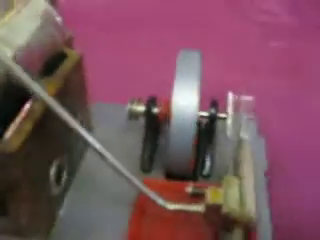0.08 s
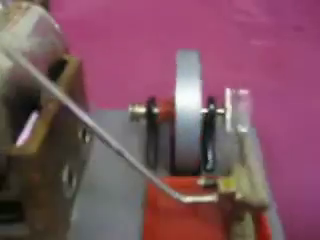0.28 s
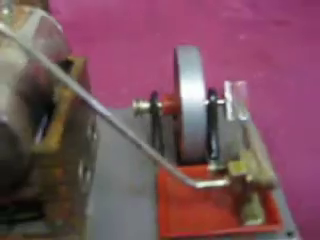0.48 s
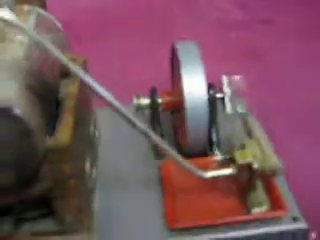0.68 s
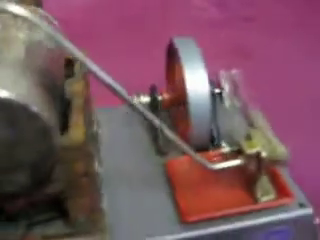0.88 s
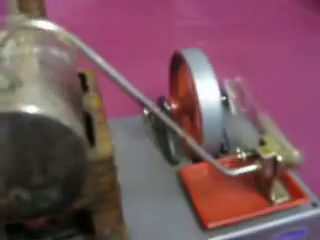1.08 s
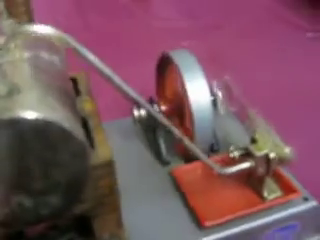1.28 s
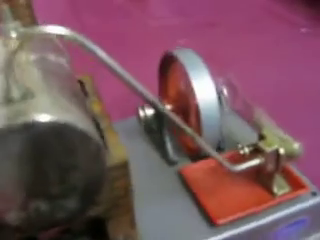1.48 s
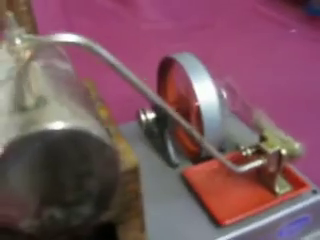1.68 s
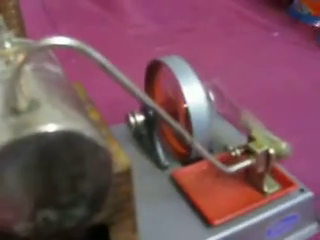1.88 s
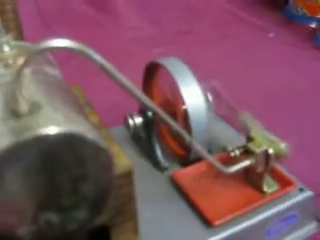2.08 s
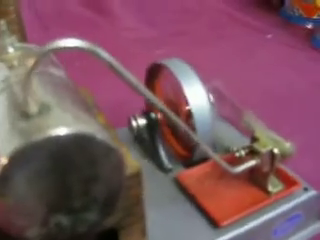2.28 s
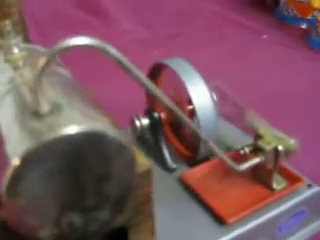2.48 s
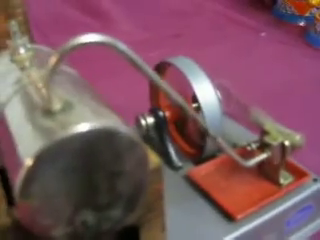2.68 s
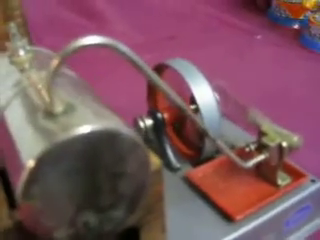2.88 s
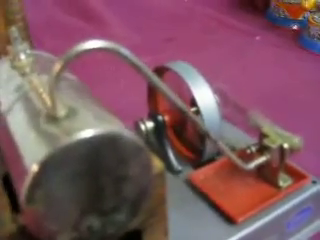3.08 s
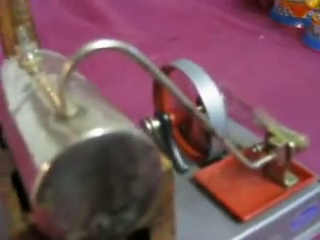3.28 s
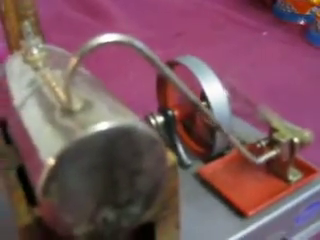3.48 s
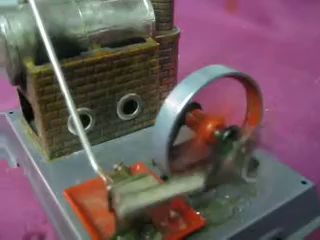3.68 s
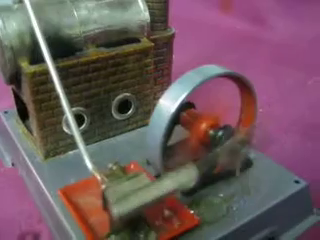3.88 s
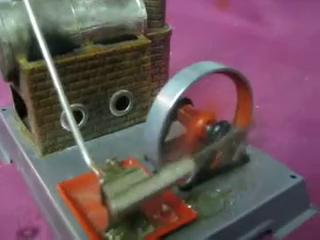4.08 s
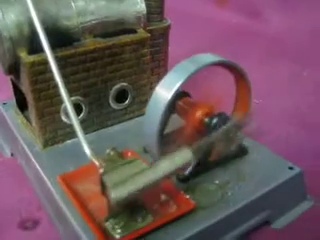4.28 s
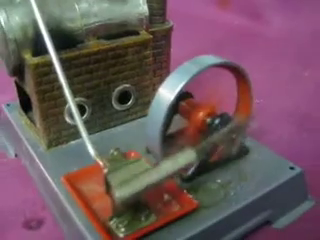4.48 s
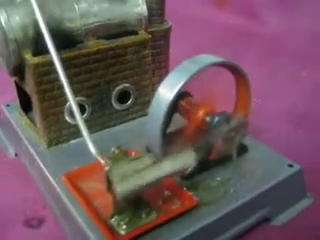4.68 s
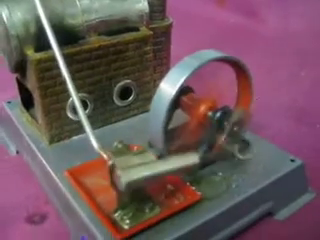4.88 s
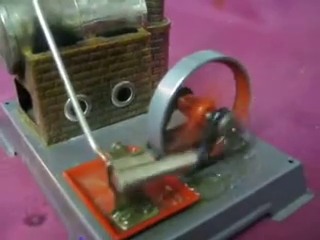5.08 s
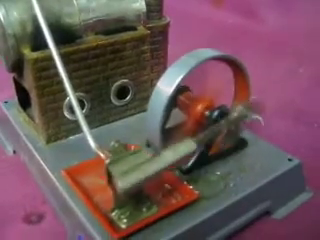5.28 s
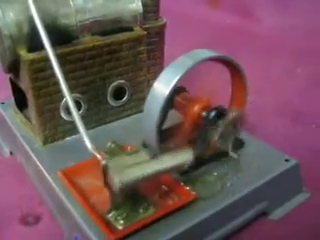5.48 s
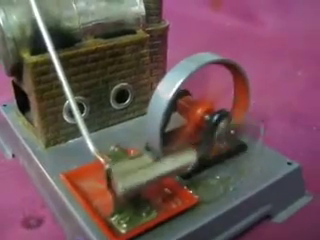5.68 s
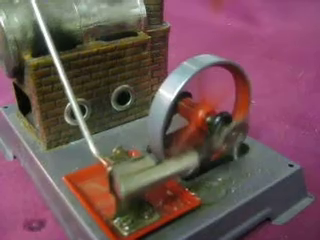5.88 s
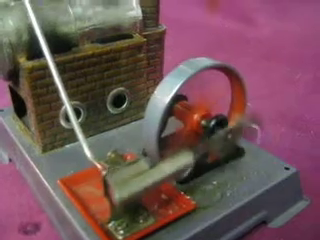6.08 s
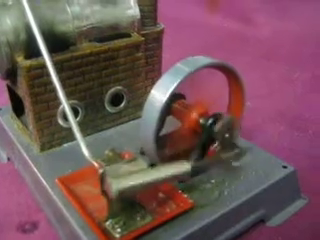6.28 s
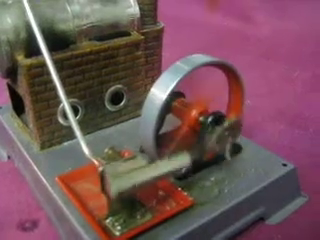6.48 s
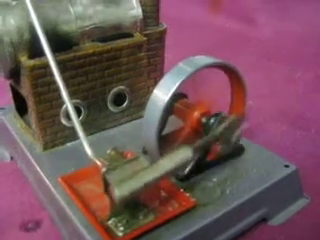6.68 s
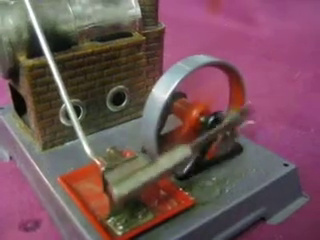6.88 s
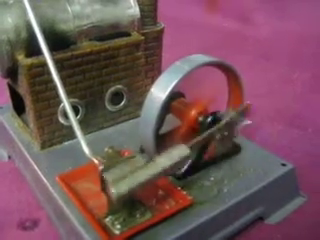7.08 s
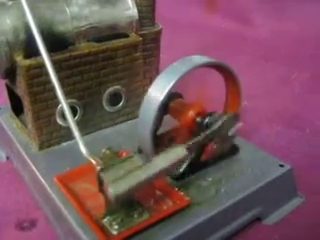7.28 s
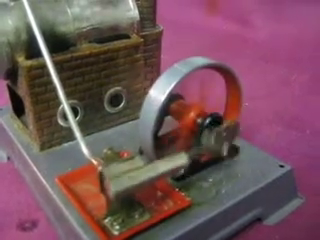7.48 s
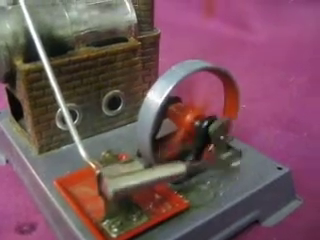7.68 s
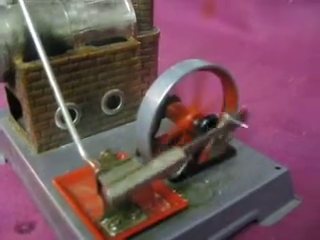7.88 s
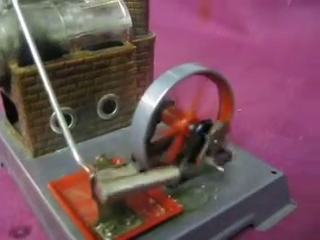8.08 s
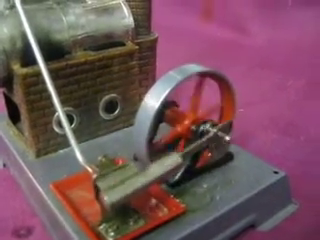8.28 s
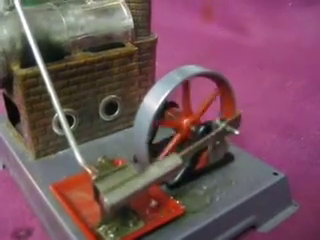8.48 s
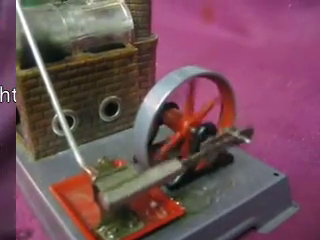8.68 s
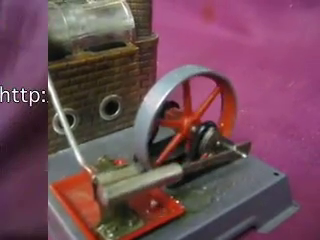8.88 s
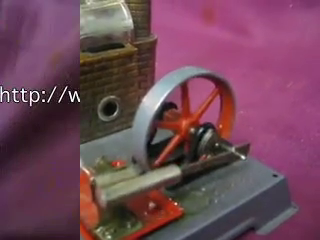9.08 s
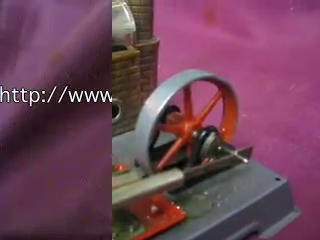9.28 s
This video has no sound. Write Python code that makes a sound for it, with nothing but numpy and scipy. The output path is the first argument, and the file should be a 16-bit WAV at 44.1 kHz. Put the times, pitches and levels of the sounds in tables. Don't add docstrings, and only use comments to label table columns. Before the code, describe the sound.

From 0 to 3.56 seconds a toy steam engine races close to the microphone: metallic knocks at about twenty-nine per second fuse into a harsh, tinny buzz, with whirring tin and pulsing steam. Its colour shifts between 0.5 and 1.75 seconds, a boiler-wall whine emerges, and the effort surges around 1.4 and 1.65. Silence lasts until about 3.7. Then slower running begins, roughly eleven turns a second: chattering clacks, bright springy rebounds, short wet exhaust puffs and gritty bearing rattle over steady boiler hiss. A faint high squeak appears around 5.5. The beats steadily spread apart, rebounds fade and the hiss sinks. Loose metal drops around 7.3 and 7.6, then a sharper one near 8.3; a longer soft puff follows at 8.8 as the wheel nearly stalls and weak hiss fades towards 9.3. The sound is thin, close and low in bass.

```python
import sys
import numpy as np
from scipy import signal
from scipy.fft import rfft, irfft
from scipy.io import wavfile
from scipy.ndimage import uniform_filter1d

SR = 44100
rng = np.random.default_rng(int(sys.argv[2]) if len(sys.argv) > 2 else 0)


def inscribe(sig):
    pcm = np.round(np.clip(np.atleast_2d(sig).T, -1, 1) * 32767)
    wavfile.write(sys.argv[1], SR, pcm.astype(np.int16))


def rack_gain(trim_db):
    fader = np.asarray(trim_db, float)
    return 10 ** (fader / 20)


N = 411012
T = np.arange(N) / SR
CUT_START_S, CUT_END_S = 3.5618, 3.6945


def evened(x):
    return x / np.sqrt(np.mean(x ** 2) + 1e-20)


def noise(spectrum, size=N):
    f, db = np.transpose(spectrum)
    hz = np.fft.rfftfreq(size, 1 / SR)
    shape = rack_gain(np.interp(np.log(hz + 1), np.log(f), db))
    return evened(irfft(rfft(rng.standard_normal(size)) * shape, size))


def hump(centre_s, half_s):
    return np.exp(-((T - centre_s) / half_s) ** 4)


# frequency in Hz, level in dB per Hz.
CRACK = [(180, -33), (300, 10), (711, 9), (2340, 8.5), (4320, 4), (5640, 4.5), (6290, 7.5), (7960, -4),
         (10400, -9), (12700, -23), (16600, -86), (22000, -120)]


def ring(modes, tilt_db, spread_db, crack_db, crack_t60, colour=CRACK):
    hz, db, t60 = np.transpose(modes)[:, :, None]
    t = np.arange(6000) / SR
    luck, phase = rng.uniform(-0.97, 1, (2, len(modes), 1))
    level_db = db + tilt_db * np.log2(hz / 2500) + spread_db * luck - 60 * t / t60
    body = np.sum(rack_gain(level_db) * np.sin(2 * np.pi * hz * t + np.pi * phase), axis=0)
    body /= np.sqrt(np.mean(body[:200] ** 2))
    crack = rack_gain(crack_db - 60 * t / crack_t60) * noise(colour, len(t))
    onset = np.minimum(t / .00015, 1)
    return (body + crack) * onset


def strike(times, sizes, sound):
    samples = np.round(np.maximum(times, 0) * SR).astype(int)
    train = np.bincount(samples, sizes * (times >= 0))
    start = np.flatnonzero(train)[0]
    played = signal.oaconvolve(train[start:], sound)[:N - start]
    return np.pad(played, (start, N - start - len(played)))


def radiated(x):
    return signal.sosfilt(signal.butter(8, 570, "high", fs=SR, output="sos"), x)


def view():
    start_s, end_s = .5, 1.75
    return np.sin(np.pi / 2 * np.clip((T - start_s) / (end_s - start_s), 0, 1)) ** 2


def racing_crank():
    start_turn, rps = -.03894, 28.94145
    spurt_turns, spurt_s, spurt_length_s = .10145, 1.19057, .63608
    return start_turn + rps * T + spurt_turns * np.tanh((T - spurt_s) / spurt_length_s)


# crank angle in turns, level in dB, brightness in dB per octave.
BLOWS = [(.018, 5.5, 0), (.038, -1, 3.5), (.066, -3.5, -3), (0.096, -7, -6), (0.129, -8, 0.5),
         (0.211, -4.5, -4), (.39, -18, 5), (0.472, -7.5, -13), (.52, -16, -3.5), (0.578, -9.5, -6),
         (0.719, -14, -14.5), (0.861, -10, 4)]
# frequency in Hz, level in dB at the start of the swing,
# level in dB at its end, t60 in seconds.
FRAME = [(820, -5, -12, 0.011), (1150, -11, -13, 0.033), (1720, -2, -30, 0.013), (3600, -12, -5, 0.025),
         (2676, 0, -8, 0.01), (2980, -14, -10, .03), (3400, -6, -9, .025), (3880, -2, -7, .024),
         (3975, -11, -5, .024), (4330, 3, -13, .02), (4450, 3, -12, .018), (4740, -6, -2, .017),
         (5200, -11, -15, .015), (6400, -4, -10, .015), (6750, -11, -11, .015), (7200, -3, -7, 0.01),
         (8900, -9, -10, 0.004), (10300, -30, -18, 0.019)]
# frequency in Hz, level in dB per Hz.
CLATTER = [(300, -41), (560, -26), (650, 10.5), (2000, -14), (3000, -5.5), (4800, 5), (5500, 2),
           (7000, 21.5), (10300, -12.5), (12500, -44), (16000, -71)]


def racing_knock(crank):
    turns = np.arange(0, np.interp(CUT_START_S, T, crank))
    wheel_modes, boiler_modes = np.delete(FRAME, 2, axis=1), np.delete(FRAME, 1, axis=1)
    sides = np.zeros((2, N))
    force_db = .7 * rng.standard_normal(len(turns))
    for angle, db, tilt_db in BLOWS:
        late, size = rng.standard_normal((len(turns), 2)).T
        times = np.interp(turns + angle, crank, T) + .000012 * late
        for side, modes in zip(sides, (wheel_modes, boiler_modes)):
            sound = ring(modes, tilt_db, spread_db=2.5, crack_db=-8, crack_t60=0.014, colour=CLATTER)
            side += strike(times, rack_gain(db + force_db + .8 * size), sound)
    swing = np.pi / 2 * view()
    knock = radiated(np.cos(swing) * sides[0] + np.sin(swing) * sides[1])
    return knock / np.std(knock[T < CUT_START_S])


def wall_whine(crank, rattle):
    hz, t60, struck_turn = 2293, .16, .3
    t = np.arange(6000) / SR
    blows = np.diff(np.floor(crank - struck_turn), prepend=-1)
    response = rack_gain(-60 * t / t60) * np.sin(2 * np.pi * hz * t)
    return evened(signal.oaconvolve(blows + 0.0062 * rattle / np.std(rattle), response)[:N])


# frequency in Hz, level in dB.
WHIRR = [(540, -44), (600, -10.5), (640, -2), (850, -1), (1200, -5.5), (1700, -2.5), (2200, -1.5),
         (3000, -3.5), (5000, -34)]
# frequency in Hz, width in Hz, gain in dB.
TIN = [(642, 62, 5.4), (717, 20, 3.9), (813, 17, 1.1), (954, 11, 5.9), (1220, 25, 12.4), (1350, 14, 4.7),
       (1427, 57, 10.5), (1625, 21, 10.6), (1910, 30, 8.3), (2600, 68, 3.8), (2820, 34, 1.1)]


def whirr(crank):
    t = T[:round(CUT_START_S * SR) + 1]
    order = np.arange(18, 150)[:, None]
    hz = 29 * order
    f, db = np.transpose(WHIRR)
    level_db = np.interp(np.log(hz), np.log(f), db)
    level_db = level_db + sum(gain / (1 + (2 * (hz - c) / width) ** 2) for c, width, gain in TIN)
    wander = signal.resample(rng.standard_normal((2, len(order), 6)), 400, axis=2)
    steady = rng.uniform(0, 2 * np.pi, hz.shape)
    knots = np.linspace(0, t[-1], 400)
    rattle = np.zeros(N)
    for k, db, drift, slip, phase in zip(order, level_db, *wander, steady):
        slow = np.interp(t, knots, rack_gain(db + 2 * drift) * np.exp(.5j * slip))
        rattle[:len(t)] += (slow * np.exp(1j * (2 * np.pi * k * crank[:len(t)] + phase))).real
    whine_db = -1.5 - 10 * np.exp(-T / .4)
    out = evened(rattle) + rack_gain(whine_db) * wall_whine(crank, rattle)
    beat = 1 + 0.26 * np.cos(4 * np.pi * (crank - .02))
    return beat * out / np.std(out[:len(t)])


# frequency in Hz, level in dB per Hz.
LEAK = [(20, -21), (200, -11), (450, -9.5), (700, -13), (1000, -2.5), (2300, 4.5), (4700, 0.5),
        (5800, -2.5), (7000, 1.5), (8500, -5), (10500, -8.5), (12500, -29), (16000, -87)]


def steam_leak(crank):
    first = 2.9 * np.exp(-((crank - .02) % 1) / 0.054)
    second = 1.3 * np.exp(-((crank - .5) % 1) / 0.065)
    return evened((1 + first + second) * noise(LEAK))


# shaft order, level in dB.
SHAKE = [(1, -72), (2, -57), (3, -61), (4, -61), (5, -63), (6, -67), (7, -64), (8, -66), (10, -61),
         (11, -61), (14, -63)]


def shaft_shake(crank):
    return sum(rack_gain(db + 3) * np.sin(2 * np.pi * (k * crank + rng.random())) for k, db in SHAKE)


def groan():
    return rack_gain(-47) * hump(.485, .035) * np.sin(2 * np.pi * 203 * T)


# centre in seconds, half width in seconds, gain in dB.
SURGES = [
    (0.221, 0.064, 0.7),
    (1.38, 0.11, 1.5),
    (1.65, 0.041, 0.9),
]


def racing():
    crank = racing_crank()
    engine = rack_gain(-25.5) * racing_knock(crank) + rack_gain(-28.5) * whirr(crank) + rack_gain(-31.5) * steam_leak(crank)
    effort_db = 0.4 - 0.55 * T + sum(gain * hump(centre, half) for centre, half, gain in SURGES)
    return rack_gain(effort_db) * engine + shaft_shake(crank) + groan()


FIRST_S, SPEED_LAW = 3.72086, (10.92537, -1.62803, .024941, -.022753)


def speed():
    return np.maximum(np.polyval(SPEED_LAW[::-1], T - FIRST_S), .3)


def run_down():
    turns = np.cumsum(speed()) / SR
    return turns - np.interp(FIRST_S, T, turns)


# frequency in Hz, level in dB per Hz.
BOILER = [(18, -19), (30, -20), (115, -10), (156, -7), (341, -6.5), (462, -9), (642, -9.5), (1040, -4),
          (1440, -7.5), (3410, -5.5), (6110, -7.5), (7870, -14.5), (10100, -11.5), (12700, -40),
          (16600, -62), (22000, -120)]
# time in seconds, hiss level in dB.
PRESSURE = [(3.69, -35), (4.8, -38), (5.8, -39), (7.8, -40.5), (8.6, -42), (9.32, -46.5)]


def boiler_hiss():
    time_s, db = np.transpose(PRESSURE)
    return rack_gain(np.interp(T, time_s, db) - 4.5) * noise(BOILER)


# frequency in Hz, level in dB, t60 in seconds.
BASE = [(757, -10.5, .11), (843, -12, .11), (925, -13, .07), (1044, -18, .06), (1175, -13, .06),
        (1500, -22, .06), (1650, -20, .06), (1820, -7, .055), (2500, -24, .05), (2680, -25, .05),
        (3010, -9, .03), (3540, -18, .05), (3975, -9, .06), (4097, -12, .1), (4152, -11, .08),
        (4235, -3, .03), (4540, -2, .026), (4650, -10, .05), (5320, -22, .04), (5910, -19, .05),
        (6270, -4, .03), (6960, -12, .03), (8600, -17, .02), (9250, -16, .02), (10100, -20, .02)]


def bearing_rattle():
    table_hz, table_width_hz, table_db = 297.4, 12, -13
    grit = (rng.random(N) < 400 / SR) * rng.standard_normal(N) * rack_gain(2 * rng.exponential(1, N))
    base = ring(BASE, -5, spread_db=1, crack_db=-6, crack_t60=.03)
    rattle = evened(signal.oaconvolve(grit, base)[:N])
    table = signal.iirpeak(table_hz, table_hz / table_width_hz, SR)
    rattle += rack_gain(table_db) * evened(signal.lfilter(*table, grit))
    return rack_gain(-40.5) * (speed() / SPEED_LAW[0]) ** 1.25 * rattle


# delay in seconds, level in dB, brightness in dB per octave.
CHATTER = [
    (0, 4, 1.5),
    (.0011, 0.5, 0),
    (.0026, -9, 3),
    (.007, -15.5, 1),
    (.013, -5, 3),
]


def knock(knock_s, knock_db):
    out = np.zeros(N)
    for delay, db, tilt_db in CHATTER:
        late, size = rng.standard_normal((len(knock_s), 2)).T
        sound = ring(BASE, tilt_db, spread_db=4, crack_db=0, crack_t60=0.015)
        out += strike(knock_s + delay * (1 + .015 * late), rack_gain(knock_db + db - 1 + .7 * size), sound)
    return out


def noisy_tail(times, levels_db):
    t = np.arange(9000) / SR
    fade = rack_gain(-60 * t / 0.17) * np.minimum(t / 0.0028, 1)
    return strike(times, rack_gain(levels_db), fade) * noise(CRACK)


# frequency in Hz, level in dB, t60 in seconds.
PIN = [(1055, -7, 0.13), (1564, -6.5, 0.084), (1960, -9, 0.042), (2450, -9, 0.09), (3200, -4.5, 0.037),
       (3520, -5.5, 0.081), (4010, 0.5, .04), (4480, 7.5, 0.021), (5390, -3.5, 0.017), (6500, -10, .03),
       (9170, 1, 0.012)]


def rebound(back_s, back_db):
    return strike(back_s, rack_gain(back_db), ring(PIN, -1.5, spread_db=3.5, crack_db=4.5, crack_t60=0.0075))


def thump(puffs, lost_rps):
    centre_s, half_s, puff_db = np.transpose(puffs)
    thump_db = puff_db + 2 - 1.5 * np.minimum(lost_rps, 4.5)
    sound = ring(BASE, -3.5, spread_db=2, crack_db=0, crack_t60=.015)
    return strike(centre_s - 0.71 * half_s, rack_gain(thump_db), sound)


# frequency in Hz, level in dB per Hz.
PUFF = [(180, -58), (300, -35), (858, -22), (1020, -12), (1530, -44), (1710, -17.5), (3470, -10.5),
        (4890, -21), (6800, -7), (9310, -9.5), (12700, -44), (16600, -81), (22000, -120)]


def exhaust(puffs):
    jet = sum(rack_gain(db) * hump(centre, half) for centre, half, db in puffs)
    sputter = rack_gain(3 * evened(uniform_filter1d(rng.standard_normal(N), 90)))
    return jet * sputter * noise(PUFF)


def rod_drag(knock_s, period, knock_db):
    creep_turn, half_turn = .94, 0.077
    drag = sum(rack_gain(db - 17.5) * hump(start + creep_turn * p, half_turn * p)
               for start, p, db in zip(knock_s, period, knock_db))
    scrape = ring(BASE, -6, spread_db=-1, crack_db=5, crack_t60=.03)
    return signal.oaconvolve(drag * rng.standard_normal(N), scrape / np.linalg.norm(scrape))[:N]


def squeak():
    pitch_hz = 5975 + 50 * np.cos(2 * np.pi * (run_down() + .15))
    level_db = -46 + 2 * evened(uniform_filter1d(rng.standard_normal(N), 400))
    return rack_gain(level_db) * hump(5.535, .14) * np.sin(2 * np.pi * np.cumsum(pitch_hz) / SR)


# time in seconds, level in dB.
LOOSE = [
    (7.318, -38),
    (7.566, -31),
    (8.246, -45),
    (8.3203, -23.5),
    (8.422, -37),
    (8.44, -45),
]
# centre in seconds, half width in seconds, level in dB.
LAST_PUFFS = [
    (7.98, 0.013, -37.5),
    (8.197, .011, -35),
    (8.77, 0.041, -36.5),
]


def coasting():
    turns, soft_rps = 31, 4.53
    rebound_turn, puff_turn, puff_half_turn = .199, .51, .042
    knock_s = np.interp(np.arange(turns), run_down(), T)
    period, rps = np.diff(knock_s), np.interp(knock_s, T, speed())
    lost_rps = SPEED_LAW[0] - rps[:-1]
    knock_db = -22.5 - 10 * np.log10(1 + (soft_rps / rps) ** 4)
    rebound_db = -20.5 - 6.5 * np.maximum(lost_rps - .8, 0)
    puff_db = -30.5 - lost_rps - 1.9 * rng.standard_normal(len(lost_rps))
    loose_s, loose_db = np.transpose(LOOSE)
    back_s = np.r_[knock_s[:-1] + rebound_turn * period, loose_s]
    back_db = np.r_[rebound_db, loose_db]
    puffs = np.c_[knock_s[:-1] + puff_turn * period, puff_half_turn * period, puff_db]
    out = knock(knock_s, knock_db)
    out += noisy_tail(np.r_[knock_s, back_s], np.r_[knock_db - 7.5, back_db - 11])
    out += rebound(back_s, back_db)
    out += thump(np.r_[puffs, LAST_PUFFS[1:2]], np.r_[lost_rps, 2])
    out += rod_drag(knock_s, period, knock_db)
    return radiated(out) + exhaust(np.r_[puffs, LAST_PUFFS])


def scene():
    before = np.clip((CUT_START_S - T) / .0008, 0, 1)
    after = np.clip((T - CUT_END_S) / .001, 0, 1)
    running_down = boiler_hiss() + bearing_rattle() + coasting() + squeak()
    return (before * racing() + after * running_down)[None]


def low_pass(x):
    return signal.sosfilt(signal.butter(12, 12890, fs=SR, output="sos"), x)


def record(dry):
    notch_hz, notch_width_hz = 7880, 714
    dipped = signal.lfilter(*signal.iirnotch(notch_hz, notch_hz / notch_width_hz, SR), dry)
    edged = signal.sosfilt(signal.butter(12, 12000, fs=SR, output="sos"), dipped)
    return low_pass(edged)


dry = scene()
out = record(dry)
inscribe(out)
```